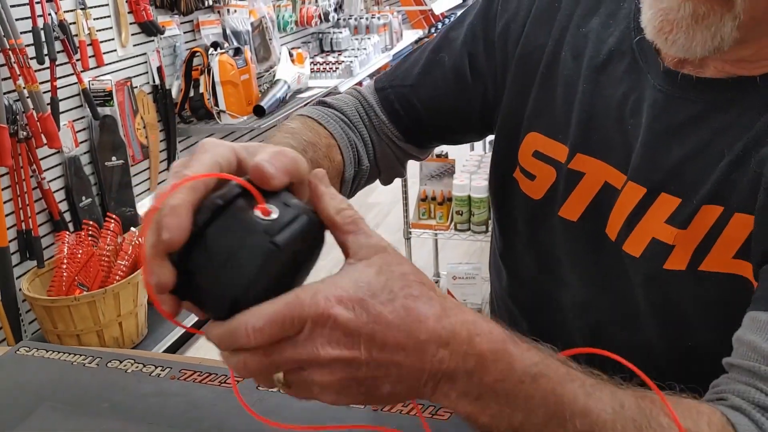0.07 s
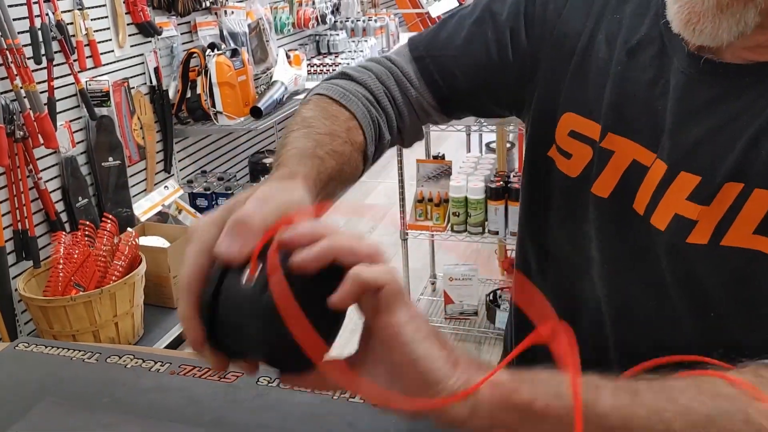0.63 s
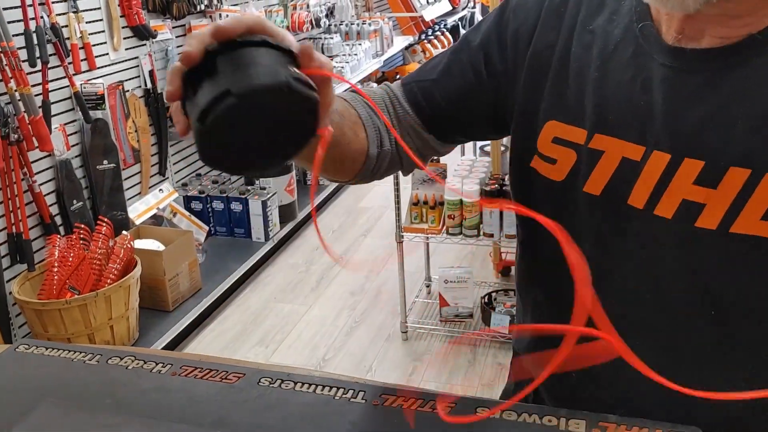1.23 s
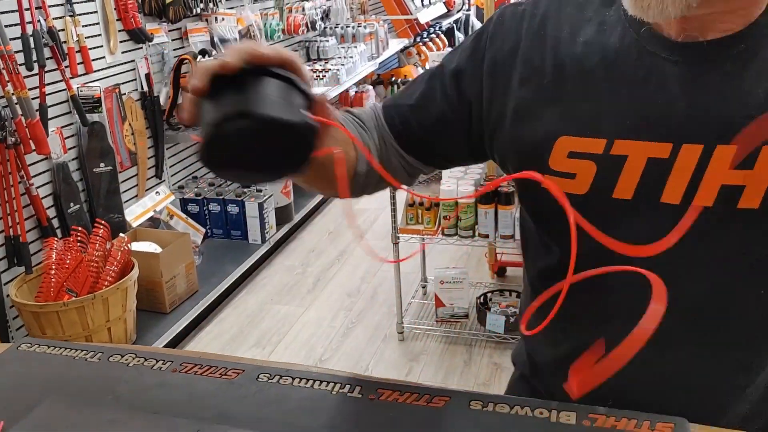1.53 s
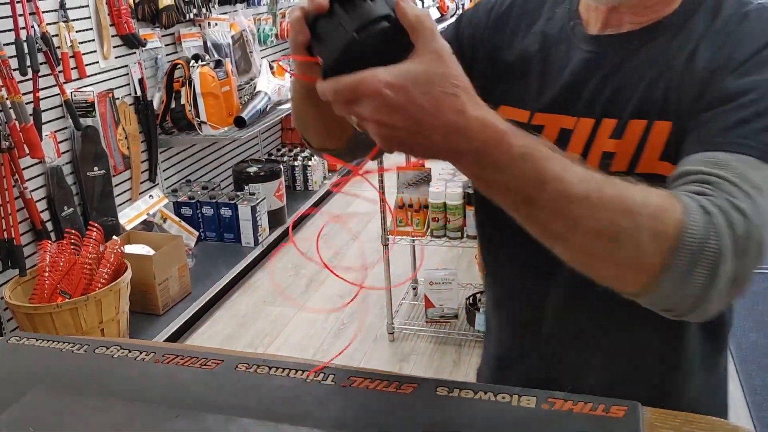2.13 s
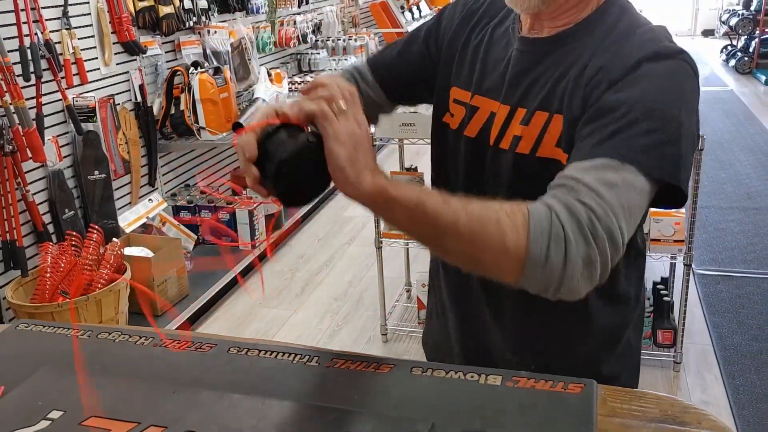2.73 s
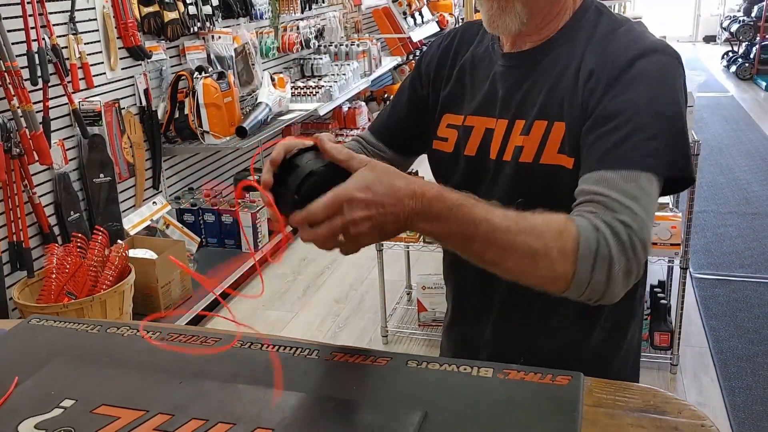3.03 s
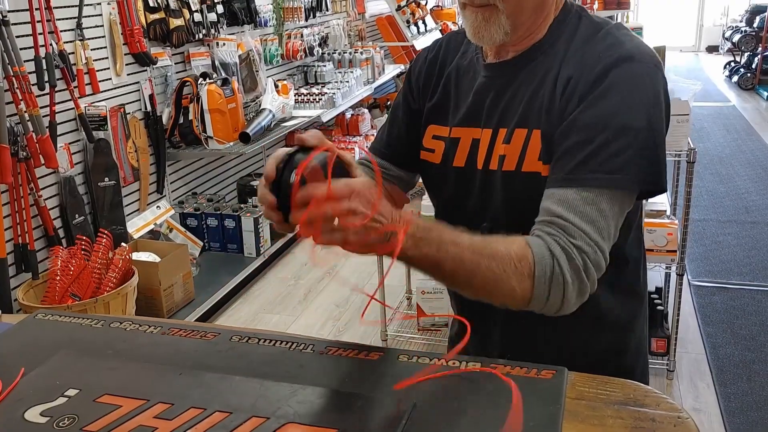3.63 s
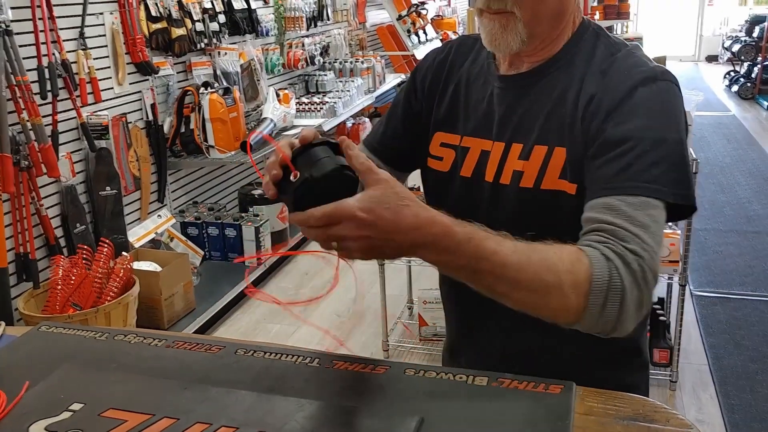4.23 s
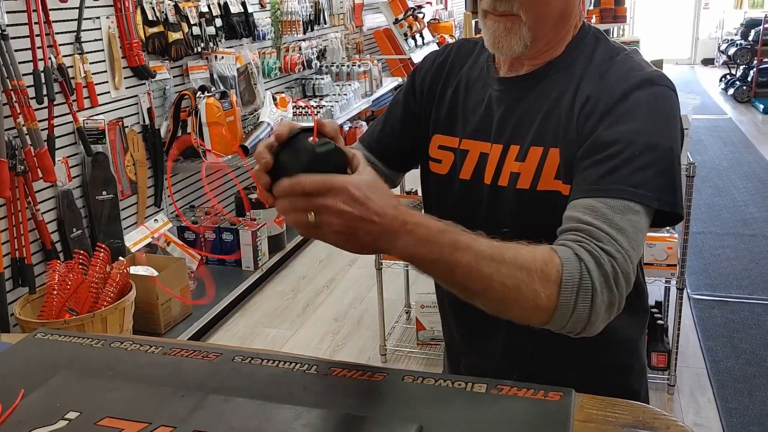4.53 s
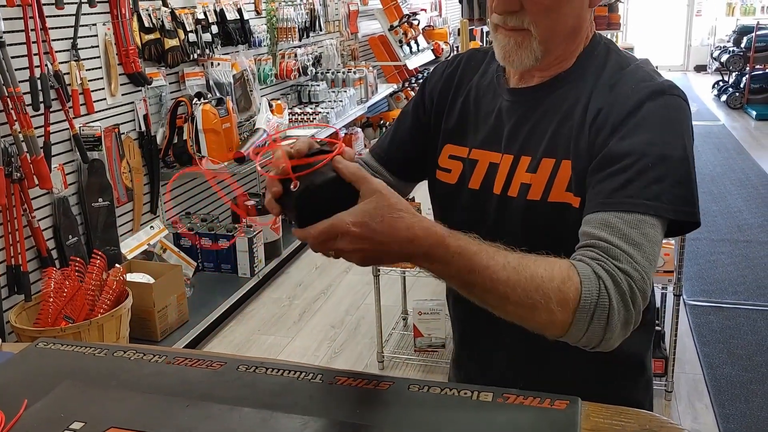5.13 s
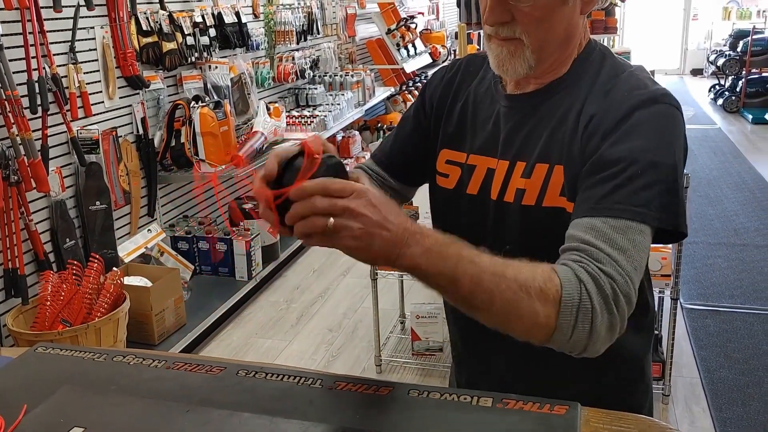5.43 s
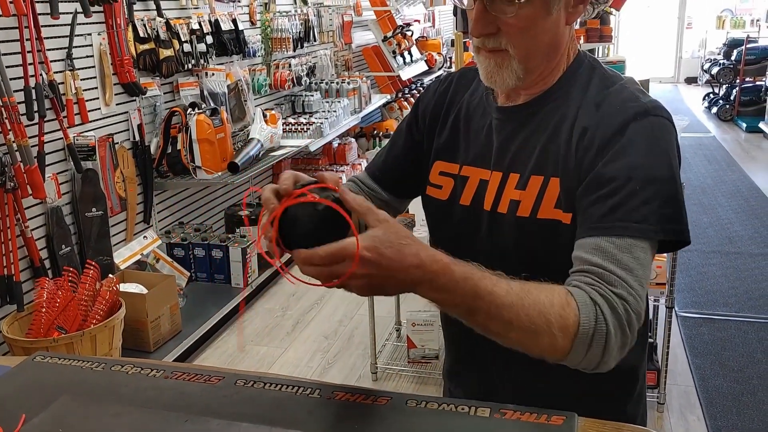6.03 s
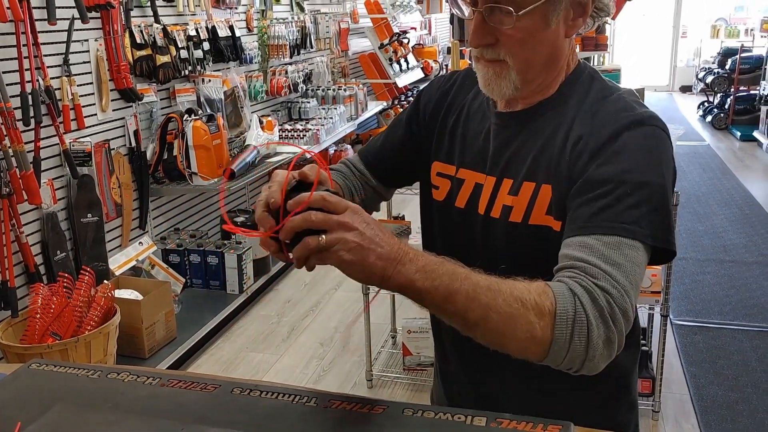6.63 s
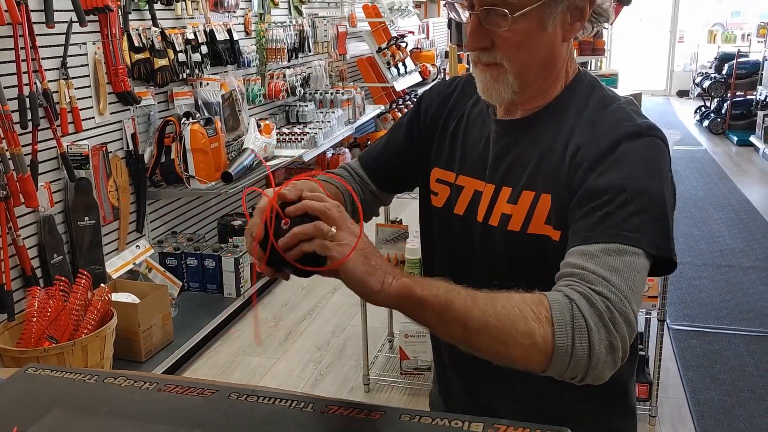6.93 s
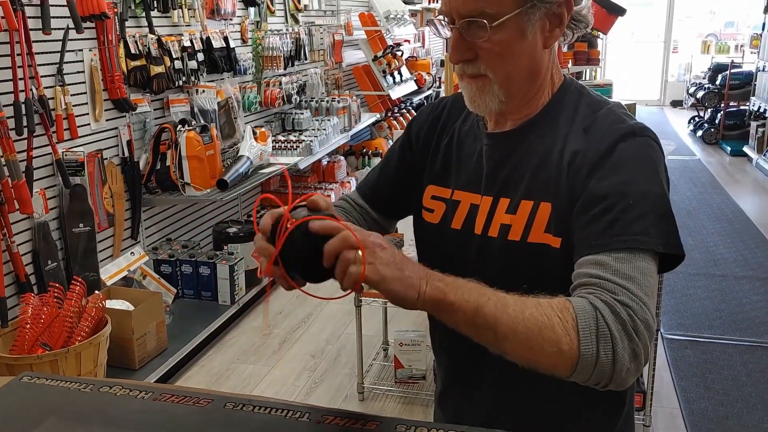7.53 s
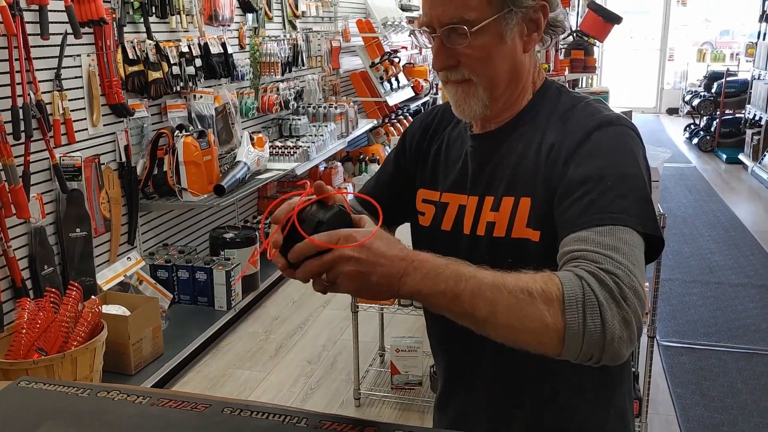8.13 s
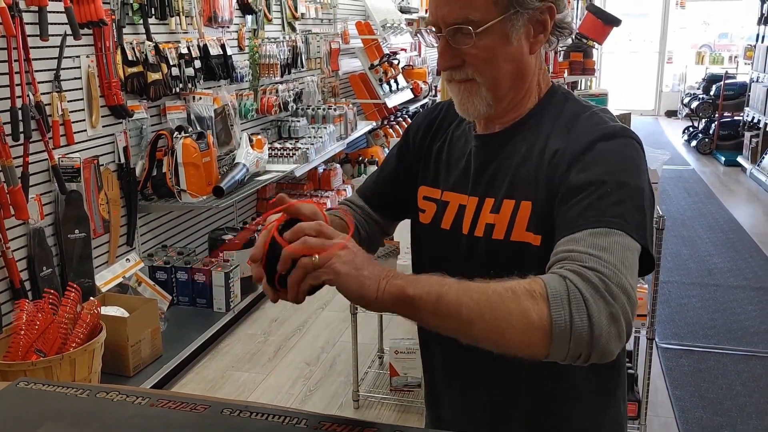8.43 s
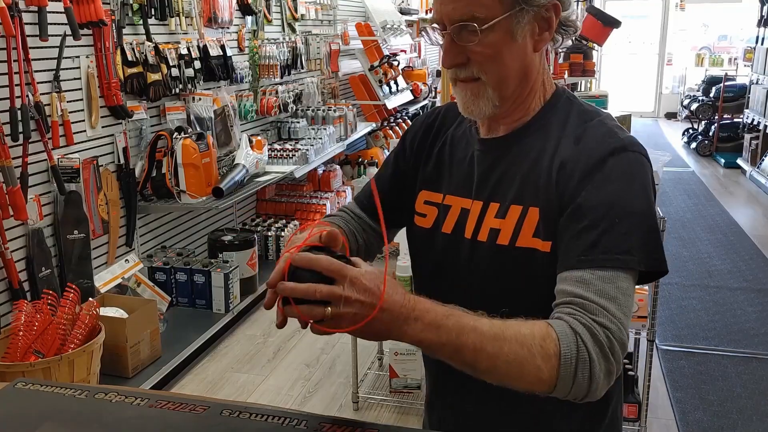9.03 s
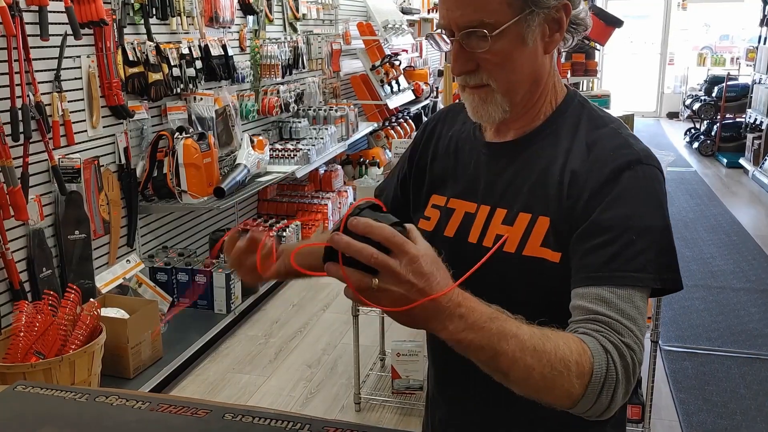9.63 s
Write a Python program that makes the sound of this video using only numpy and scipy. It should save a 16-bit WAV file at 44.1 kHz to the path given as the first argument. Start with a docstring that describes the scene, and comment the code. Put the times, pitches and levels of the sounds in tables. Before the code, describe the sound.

In a shop, close to the microphones, a plastic trimmer head is twisted by hand to wind in nylon line. Six short twists each give a few loud ratchet snaps that ring in the hollow shell and the room. Between them the line rasps and ticks and the head knocks softly. A dull bump follows the first twist, the line twangs twice, and lighter handling ends it, over a low rumble and a faint, distant engine.

```python
"""In a shop, close on a pair of microphones, nylon line is wound by hand into a plastic trimmer head.
Over a low rumble the loose line rasps and ticks against the head, which knocks softly in the hands.
From 0.5 s, six twists each drive the spool's ratchet over a few teeth; the loud snaps ring in the hollow
shell and the room. A dull bump follows the first twist, a far engine revs at 2 s, and a freed line end
twangs near 4 s and 7 s. Then only the handling goes on, and the engine revs again near 9 s."""
import sys
import numpy as np
from scipy import signal
from scipy.fft import rfft, irfft, next_fast_len
from scipy.io import wavfile

SR = 44100
rng = np.random.default_rng(int(sys.argv[2]) if len(sys.argv) > 2 else 0)


def to_wav(sig):
    """Store sig (one row per channel, or 1-D mono) as 16-bit WAV at the path in sys.argv[1].

    Samples outside -1..1 are clipped; the rate is SR.
    """
    pcm = np.clip(np.atleast_2d(sig), -1, 1) * 32767
    pcm = np.round(pcm).astype(np.int16)
    wavfile.write(sys.argv[1], SR, pcm.T)  # frames by channels


N = 431298
TIME = np.arange(N) / SR

# a brief dip in the background, the finger rub and the reverberation: (time [s], level [dB])
DIP = [(.66, 2), (.76, -15), (1.35, -9.5), (1.48, 0.5)]
# the hollow ring that a looser grip frees: (shell, wall, edge, crack) [share]
HOLLOW_RING = [1, 0, 0, 0]


def from_db(db):
    """Decibels to gain."""
    return 10 ** (np.asarray(db) / 20)


def unit_rms(x):
    """Scale to rms 1."""
    return x / np.sqrt(np.mean(x ** 2) + 1e-20)


def unit_energy(x):
    """Scale each channel to energy 1."""
    return x / np.sqrt(np.sum(x ** 2, axis=-1, keepdims=True) + 1e-20)


def in_time(points):
    """Read a curve at every sample."""
    return np.interp(TIME, *np.transpose(points))


def at_hz(points, hz):
    """Read a spectrum on a log-frequency axis."""
    f, value = np.transpose(points)
    return np.interp(np.log(hz + 1e-3), np.log(f), value)


def coloured(x, points):
    """Give a sound a smooth spectrum."""
    size = next_fast_len(x.shape[-1] + 2048)
    gain = from_db(at_hz(points, np.fft.rfftfreq(size, 1 / SR)))
    return irfft(rfft(x, size) * gain, size)[..., :x.shape[-1]]


def band(x, low, high):
    """Causal band-pass, edges in Hz."""
    return signal.sosfilt(signal.butter(2, [low, high], "band", fs=SR, output="sos"), x)


def stereo_noise(size, alike):
    """White noise with the share `alike` of its power common to both channels."""
    shared = rng.standard_normal(size)
    return np.sqrt(alike) * shared + np.sqrt(1 - alike) * rng.standard_normal((2, size))


def convolved(x, response):
    """Pass a sound through an impulse response."""
    return signal.oaconvolve(x, np.atleast_2d(response), axes=-1)[:, :N]


def add(out, s, sound):
    """Mix a short sound in at a time."""
    start = max(round(s * SR), 0)
    out[:, start:start + sound.shape[-1]] += sound[:, :N - start]


def held(s, length_s, attack_s, release_s):
    """An envelope that swells up to a time, holds and dies away."""
    before = np.maximum(s - TIME, 0) / attack_s
    after = np.maximum(TIME - s - length_s, 0) / release_s
    return np.exp(-np.minimum(before + after, 20))


def room_tone(rumble_db=-61, air_db=-67):
    """The shop's low rumble, nearly alike at both microphones, under faint, wide air noise."""
    # spectra of the rumble and the air: (frequency [Hz], relative density [dB])
    rumble_colour = [(20, -10.5), (45, -14.5), (70, -2), (120, 2), (175, -1), (200, -5), (280, -5),
                     (380, -14.5), (700, -37)]
    air_colour = [(200, -4.5), (450, 8.5), (1200, -1), (2400, -6.5), (4200, -12), (8000, -10.5),
                  (12000, -8), (13500, -31)]
    rumble = from_db(rumble_db) * unit_rms(coloured(stereo_noise(N, alike=0.89), rumble_colour))
    air = from_db(air_db) * unit_rms(coloured(stereo_noise(N, alike=0.3), air_colour))
    return from_db(in_time(DIP)) * (rumble + air)


def shell_response(crack_db, damping, vary_db=0.5, detune=0.029):
    """The head's answer to a click: a dry crack, and resonances that vary with spot struck and grip."""
    # resonances of the head: (frequency [Hz], width at damping 1 [Hz], relative level [dB])
    modes = [(564, 99, -8.5), (775.7, 27, 9.5), (876, 49, -1), (1000, 100, -7.5), (1197, 200, -6),
             (1450, 170, -11.5), (1649.5, 48, -2), (1737, 17, 1), (1900, 69, -13.5), (2602, 62, -2.5),
             (2896, 52, -4.5), (3326, 200, -10), (3960, 240, -10), (4277, 130, -9.5), (5476, 490, -8.5),
             (6140, 220, -1), (6884, 160, -7.5), (7500, 230, -9), (8335, 310, -7.5), (9560, 87, -6.5),
             (10900, 390, -17), (11420, 570, -7.5)]
    click = signal.unit_impulse(3072)
    out = from_db(crack_db) * click
    for (hz, width, db), (spot, grip) in zip(modes, rng.standard_normal((len(modes), 2))):
        freedom = min(hz / 3000, 1)   # the low, hollow resonances hardly move
        angle = 2 * np.pi * hz * (1 + detune * freedom * grip) / SR
        radius = np.exp(-np.pi * width * damping / SR)
        gain = from_db(db + vary_db * np.sqrt(freedom) * spot) * (1 - radius ** 2) / 2
        out += gain * signal.lfilter([1, 0, -1], [1, -2 * radius * np.cos(angle), radius ** 2], click)
    return out


def stick_slip(slips_per_s=400, spread_db=4.0, slip_decay_s=0.002, smooth_gain=0.94):
    """Friction of nylon on plastic: tiny uneven jerks over a smooth hiss."""
    slipping = rng.random(N) < slips_per_s / SR
    slips = slipping * from_db(spread_db * np.minimum(rng.exponential(1, N), 4))
    envelope = signal.lfilter([1], [1, -np.exp(-1 / (slip_decay_s * SR))], slips + 1e-18)
    jerks = unit_rms(envelope * stereo_noise(N, alike=0.094))
    return unit_rms(jerks + smooth_gain * stereo_noise(N, alike=0.089))


def sliding_line(rub_hiss_db=-73, rub_shell_db=-76, wander_db=7):
    """Pulled line rasps, its colour wandering as it moves over the head; fingers rub faintly between."""
    # pulls through eyelets and fingers: (time [s], length [s], hiss [dB], relative shell level [dB])
    pulls = [(0.0, .02, -56.5, -57), (0.087, 0.045, -53.5, -56.5), (0.154, .018, -39.5, -47),
             (0.257, .036, -41.5, -59.5), (0.437, .03, -43, -45), (1.44, .02, -52.5, -49.5),
             (1.6, .01, -62.5, -80), (1.788, 0.042, -46.5, -74.5), (1.881, 0.038, -39, -42),
             (1.965, 0.21, -60.5, -71.5), (2.115, 0.019, -53, -67.5), (2.303, .045, -46, -51),
             (2.461, .07, -40, -22.5), (2.802, 0.05, -35, -38), (2.889, 0.11, -45.5, -64),
             (3.265, 0.034, -52, -76), (3.385, 0.029, -61.5, -61), (3.466, 0.084, -62, -74.5),
             (3.646, 0.022, -47, -58), (4.313, 0.12, -47, -61), (4.669, .11, -40, -25),
             (5.166, 0.0092, -55, -67), (5.227, 0.027, -56.5, -56), (5.474, .02, -46, -48),
             (6.126, 0.089, -59.5, -58), (6.269, .025, -49.5, -61), (6.305, 0.014, -34.5, -41),
             (6.404, 0.062, -64, -76), (6.882, 0.018, -29, -23), (6.923, 0.065, -37, -53),
             (7.437, .07, -57, -57.5), (7.57, 0.083, -54.5, -68.5), (7.655, 0.027, -58, -70),
             (7.835, 0.038, -63.5, -82.5), (8.055, 0.12, -57.5, -63.5), (8.165, 0.016, -37.5, -25.5),
             (8.19, 0.079, -44, -46), (8.353, 0.076, -50, -75), (8.453, 0.0081, -53.5, -24.5),
             (8.51, 0.12, -47.5, -49), (8.737, 0.048, -48, -49), (8.933, .04, -36, -50.5),
             (9.0, 0.13, -56, -62.5), (9.159, 0.0095, -48, -61.5), (9.254, 0.084, -47.5, -50.5),
             (9.354, 0.025, -45, -65.5), (9.439, 0.019, -39.5, -52.5), (9.484, 0.025, -52, -62.5)]
    # tone of the hiss: (frequency [Hz], gain [dB])
    hiss_colour = [(700, -27.5), (1200, -23), (1900, 0), (2400, -6.5), (4200, 6.5), (7000, -1.5),
                   (9000, -1.5), (11600, 1.5), (14000, -5.5)]
    dip = from_db(in_time(DIP))
    hiss_gain, shell_gain = from_db(rub_hiss_db) * dip, from_db(rub_shell_db) * dip
    for s, length_s, hiss_db, shell_db in pulls:
        pull = held(s, length_s, attack_s=0.0054, release_s=0.012)
        hiss_gain = np.maximum(hiss_gain, from_db(hiss_db) * pull)
        shell_gain = np.maximum(shell_gain, from_db(shell_db - 1) * pull)
    friction = stick_slip()
    spots = from_db(wander_db * unit_rms(band(rng.standard_normal((7, N)), 3.4, 16)))
    spots /= np.linalg.norm(spots, axis=0)   # seven spots on the head share a constant power
    responses = [shell_response(crack_db=-27, damping=0.8, vary_db=6, detune=0.09) for _ in spots]
    rubbed = 0
    for share, response in zip(spots, responses):
        force = friction * rng.choice([-1, 1], N)   # random signs keep the spots uncorrelated
        rubbed += share * convolved(force, unit_energy(response))
    hiss = hiss_gain * unit_rms(coloured(rubbed, hiss_colour))
    return hiss + shell_gain * unit_rms(band(rubbed, 600, 2500))


def scrape_in(rise_s):
    """Surfaces rub harder and harder until they let go."""
    grains = stereo_noise(2048, alike=0.13) * rng.exponential(1, 2048)
    return unit_energy(grains * np.exp(-TIME[:2048] / rise_s)[::-1])


def chatter(decay_s, alike):
    """One contact: a few milliseconds of micro-impacts with an even spectrum."""
    fade = np.exp(-TIME[:1024] / decay_s)
    burst = stereo_noise(1024, alike) * fade
    for _ in range(3):
        flattened = irfft(np.exp(1j * np.angle(rfft(burst))))
        burst = flattened * np.sqrt(fade)
    return unit_energy(burst)


def contacts(rows, colour_db, shades, gain_db, crack_db, damping, decay_s, delay_s, scrape_db, rise_s):
    """Each contact scrapes, then strikes the head; `shades` spreads its touch over four registers."""
    # the head's registers, in the order shell, wall, edge, crack: (low [Hz], high [Hz])
    registers = [(420, 1100), (1100, 2100), (2400, 5000), (5000, 15000)]
    out = np.zeros((2, N))
    for s, strength_db, *touch_db in rows:
        shell = shell_response(crack_db, damping)
        register_db = gain_db + strength_db + np.array(colour_db) + np.dot(touch_db, shades)
        for k, (low, high) in enumerate(registers):
            scrape = from_db(scrape_db) * scrape_in(rise_s)
            force = np.hstack([scrape, chatter(decay_s, alike=0.85 / (k + 1))])
            sound = unit_energy(convolved(force, band(shell, low, high)))
            add(out, s + delay_s - scrape.shape[-1] / SR, from_db(register_db[k]) * sound)
    return out


def bright_clicks():
    """Sharp, bright clicks: line flicks, and at 0.7 s the crack of a ratchet snap."""
    # clicks on the plastic: (time [s], relative level [dB], body [dB])
    clicks = [(0.115, -45, 11), (0.148, -50, 22), (0.702, -14.5, -5.5), (1.784, -45.5, 6.5),
              (1.811, -40, -2.5), (1.875, -20, 16.5), (2.017, -45.5, 14.5), (2.958, -44, 30),
              (3.28, -33.5, -1), (4.287, -36, 26.5), (5.072, -35, 19.5), (6.394, -33.5, 0),
              (6.434, -37, 9.5), (6.626, -9.5, 6), (7.58, -30.5, -2), (7.625, -35.5, -7), (8.357, -39, 2),
              (8.571, -30, 25.5), (8.812, -36, 9.5), (8.943, -25, 13), (9.163, -27, -6), (9.255, -35, 16),
              (9.291, -33, -5), (9.321, -26.5, 15.5), (9.436, -29.5, -1)]
    # tone of a click, nearly all crack: (shell, wall, edge, crack) [dB]
    colour_db = [-29.5, -28, -21.5, 0.5]
    # the body of the head, sounded by a square hit: (shell, wall, edge, crack) [share]
    body = [1, 1, .8, 0]
    return contacts(clicks, colour_db, [body], gain_db=18, crack_db=-23.5, damping=1.0,
                    decay_s=0.0019, delay_s=0.00068, scrape_db=-28, rise_s=0.005)


def spool_knocks():
    """The spool knocks dully in its housing; a harder contact adds treble."""
    # knocks of the spool: (time [s], relative level [dB], hollow ring [dB], hardness [dB])
    knocks = [(0.467, -25, 8, -1.5), (2.336, -35, 11, -3), (2.43, -18.5, 0.5, -9), (2.725, -18, 0, 8),
              (2.768, -14, -5.5, 7.5), (3.573, -28.5, -9, -26.5), (4.596, -27.5, 1.5, -7.5),
              (6.304, -32, -13, 8), (6.888, -25.5, 15, 7.5), (6.939, -28, 6.5, -5),
              (7.081, -26.5, 6.5, 7.5), (7.476, -42, 5, -2), (7.644, -48, -22, -8), (8.145, -39, 3, 4),
              (8.168, -20, 1, -10), (8.44, -26, -11.5, -13), (8.453, -34.5, 13.5, 6.5),
              (8.622, -26, -6.5, -9), (8.645, -46, 17.5, -2.5), (8.765, -36, -10, 0.5),
              (8.964, -40, 1, 3.5)]
    # tone of a knock: (shell, wall, edge, crack) [dB]
    colour_db = [3, -1.5, -3.5, -17]
    # the treble that hardness adds: (shell, wall, edge, crack) [share]
    hardness = [0, 0, .6, 1]
    return contacts(knocks, colour_db, [HOLLOW_RING, hardness], gain_db=19.5, crack_db=-23.5,
                    damping=0.48, decay_s=0.0045, delay_s=0.0012, scrape_db=-18, rise_s=0.012)


def ratchet_snaps():
    """Ratchet teeth snap over, alike each time, in a head damped by the tight grip of the twist."""
    # teeth letting go: (time [s], relative level [dB], hollow ring [dB])
    teeth = [(0.519, -17.5, 1.5), (0.574, -22, 7.5), (0.7, -21, -2.5), (2.407, -15.5, 4.5),
             (2.546, -17.5, 1.5), (3.684, -16, 0), (3.785, -17.5, 0), (3.884, -16, -2), (4.021, -15.5, -1),
             (4.642, -16, 0.5), (4.707, -16.5, -3), (4.772, -14.5, 0.5), (5.49, -16.5, 2),
             (5.57, -17.5, 0.5), (5.68, -19, 2), (5.812, -15, 1), (6.511, -18, 0), (6.638, -15.5, 2)]
    # tone of a snap: (shell, wall, edge, crack) [dB]
    colour_db = [0.5, 0, -5, -1.93]
    return contacts(teeth, colour_db, [HOLLOW_RING], gain_db=29.5, crack_db=-9.5, damping=1.25,
                    decay_s=0.0028, delay_s=0.0018, scrape_db=-13.5, rise_s=0.01)


def dull_bumps(gain_db=-11, rise_s=0.0066, decay_s=0.018):
    """A soft, heavy touch swells for a moment and dies quickly."""
    # heavy touches: (time [s], relative peak level [dB])
    touches = [(1.109, -46.5), (1.439, -14)]
    # spectrum of a bump: (frequency [Hz], relative density [dB])
    colour = [(35, -59), (60, -40), (160, -4.5), (249, -16.5), (521, -3.5), (699, -11), (759, -18.5),
              (1090, -18.5), (1990, -51.5), (3000, -54), (3900, -84), (6600, -120)]
    out, t = np.zeros((2, N)), TIME[:8192]
    envelope = (1 - np.exp(-t / rise_s)) ** 2 * np.exp(-t / decay_s)
    envelope /= envelope.max()
    for s, peak_db in touches:
        thud = unit_rms(coloured(stereo_noise(len(t), alike=0.65), colour))
        add(out, s - 0.008, from_db(peak_db + gain_db) * thud * envelope)
    return out


def distant_engine(climb_hz_per_s=21, fade_s=0.075, octave_db=-7, waver_share=0.016):
    """A far engine hums, its pitch wavering slightly as it climbs through each rev."""
    # revs: (time [s], length [s], starting pitch [Hz], level [dB])
    revs = [(2.145, 1.1, 86.03, -55), (8.849, 1.0, 76.2, -59.5)]
    out = np.zeros(N)
    waver = unit_rms(band(rng.standard_normal(N), 1.8, 10))
    for s, length_s, start_hz, db in revs:
        hz = start_hz + climb_hz_per_s * np.clip(TIME - s, 0, length_s)
        phase = 2 * np.pi * np.cumsum(hz * (1 + waver_share * waver)) / SR
        hum = np.sin(phase) + from_db(octave_db) * np.sin(2 * phase)
        out += from_db(db) * held(s, length_s, fade_s, fade_s) * hum
    return out


def line_twangs():
    """A stiff end of line springs free and buzzes briefly, lower when it is longer."""
    # ends springing free: (time [s], level [dB], pitch [factor])
    releases = [(3.91, -30, .91), (7.083, -31, 1)]
    # bands of the buzz: (centre at pitch 1 [Hz], width [Hz], relative level [dB], t60 [s])
    modes = [(1960, 200, -4, 0.33), (2830, 730, 5.5, 0.12), (3100, 270, -3, 0.31), (3770, 770, 0, 0.12)]
    out, t = np.zeros((2, N)), TIME[:16384]
    for s, level_db, pitch in releases:
        for hz, width, db, t60 in modes:
            noise = stereo_noise(len(t), alike=0.46)
            buzz = unit_rms(band(noise, pitch * hz - width / 2, pitch * hz + width / 2))
            add(out, s, from_db(level_db + db - 60 * t / t60) * buzz)
    return out


def shop_reverb(x, build_s=0.014, first_echo_s=0.00028, lumpy_db=1.5):
    """Uneven echoes from shelves and walls thicken into a tail of about half a second."""
    # decay of the shop: (frequency [Hz], t60 [s])
    decay_times = [(200, 0.01), (530, 0.4273), (800, 0.4242), (1400, 0.4622), (3700, 0.52), (7000, 0.3619),
                   (12000, 0.5647)]
    # tone of the tail: (frequency [Hz], gain [dB])
    colour = [(150, -12.5), (400, -6.5), (800, 1), (1600, -3), (3000, -1), (7500, -3), (11500, -8.5),
              (13500, -27.5)]
    t, tail = TIME[:40000], 0
    white = rng.standard_normal((2, 2, len(t)))
    edges_hz = np.geomspace(100, 18000, 15)
    for k, (low, high) in enumerate(zip(edges_hz, edges_hz[1:])):
        t60 = at_hz(decay_times, np.sqrt(low * high))
        tail += band(white[k % 2], low, high) * from_db(-60 * t / t60)
    swell = 1 - np.exp(-np.maximum(t - first_echo_s, 0) / build_s)
    lumps = from_db(lumpy_db * unit_rms(band(rng.standard_normal((2, len(t))), 74, 430)))
    return convolved(x, coloured(unit_energy(tail * swell * lumps), colour))


def scene(room_dip_share=0.42):
    """The head close by, the shop around it, the engine far off; the hard snaps fill the room most."""
    snaps, knocks, clicks = ratchet_snaps(), spool_knocks(), bright_clicks()
    slide, bumps, twangs = sliding_line(), dull_bumps(), line_twangs()
    direct = snaps + knocks + clicks + slide + bumps + twangs
    into_room = (from_db(0.5) * snaps + from_db(-8.5) * knocks + from_db(-8) * clicks
                 + from_db(-14.5) * slide + from_db(-16.5) * bumps + from_db(-18) * twangs)
    room = from_db(room_dip_share * in_time(DIP)) * shop_reverb(into_room)
    return direct + room + room_tone() + distant_engine()


def record(dry, left_lag_samples=180, ceiling=0.95, stopband_hz=16400):
    """Two unlike microphones, the left channel late; the snaps overload, and the top is cut."""
    # response of the microphones: (frequency [Hz], left [dB], right [dB])
    mics = [(100, 2, 2.5), (495, -4.5, -3), (1000, -1, 0.5), (2050, -3, 0), (4530, -3, 3), (7500, -4.5, 6),
            (9130, -8.5, -3.5), (9860, -2.5, -9.5), (11800, -1, -10), (11700, -10, -1.5), (12800, -13, -12),
            (16000, -10.5, -8)]
    left = coloured(dry[0], np.array(mics)[:, [0, 1]])
    right = coloured(dry[1], np.array(mics)[:, [0, 2]])
    late_left = np.pad(left, (left_lag_samples, 0), mode="reflect")[:N]
    pair = np.array([late_left, right])
    clipped = pair / (1 + (pair / ceiling) ** 6) ** (1 / 6)
    return signal.sosfilt(signal.cheby2(16, 50, stopband_hz, fs=SR, output="sos"), clipped)


dry = scene()
out = record(dry)
to_wav(out)
```